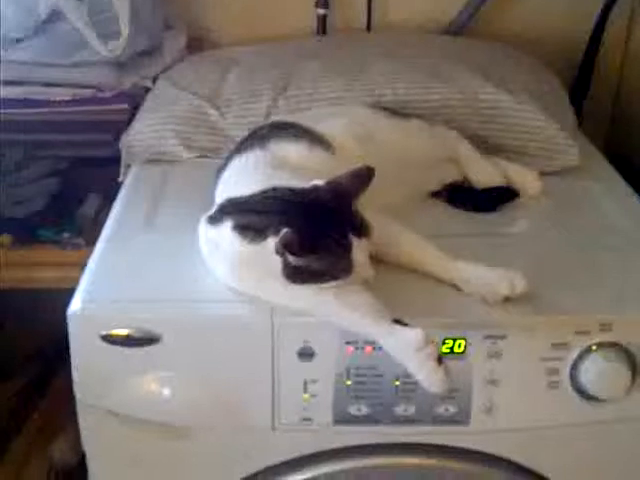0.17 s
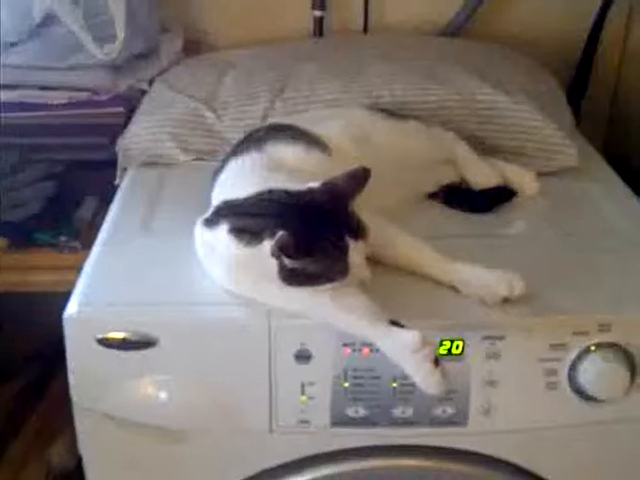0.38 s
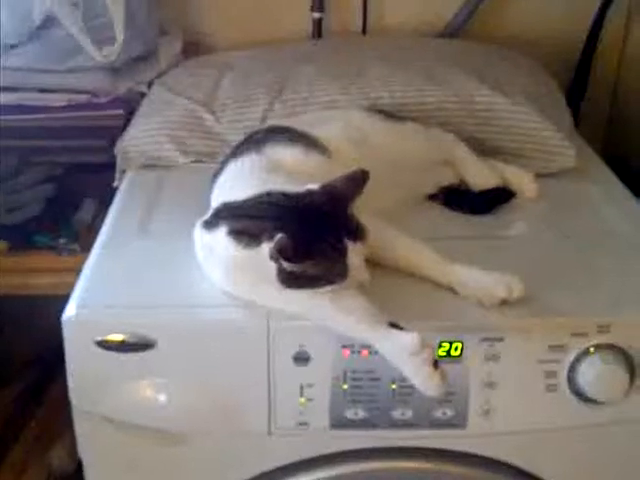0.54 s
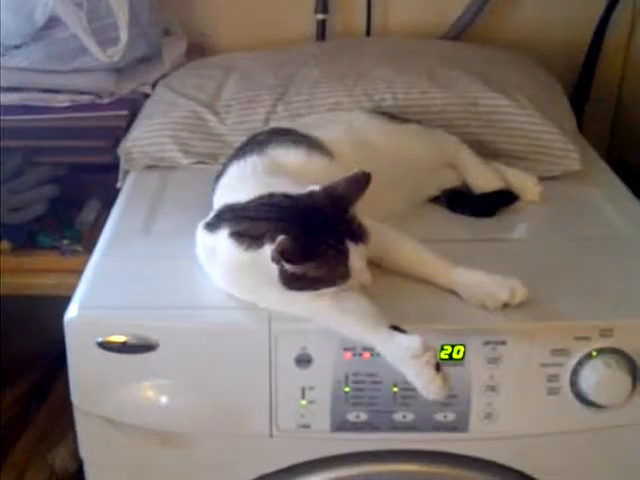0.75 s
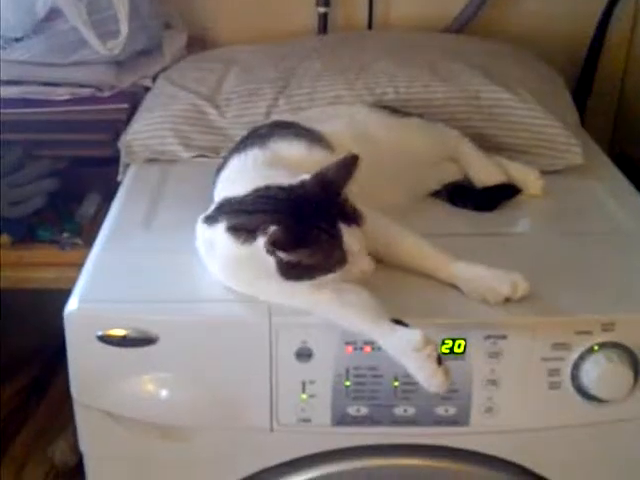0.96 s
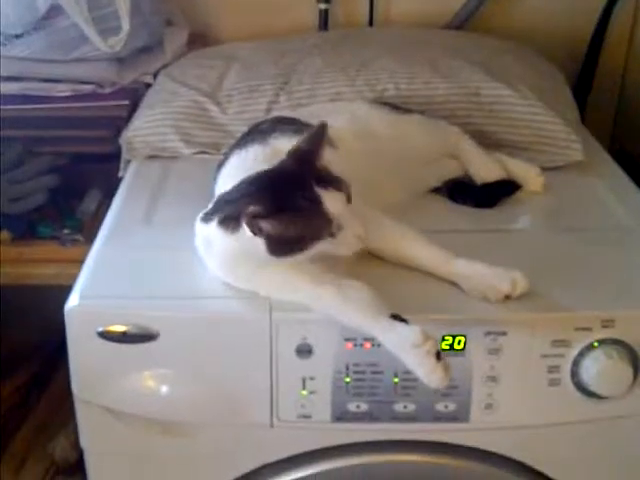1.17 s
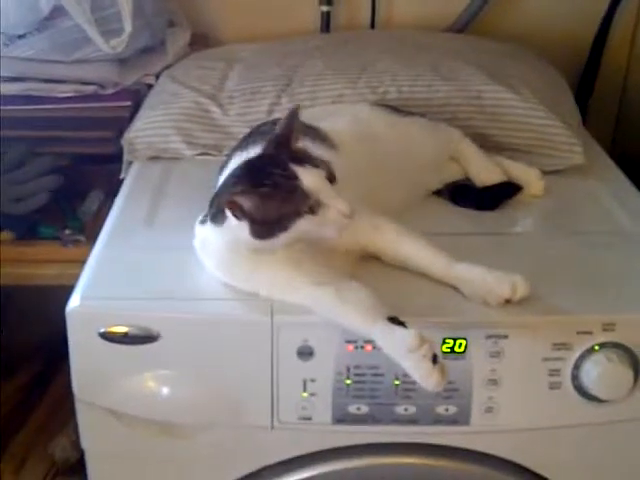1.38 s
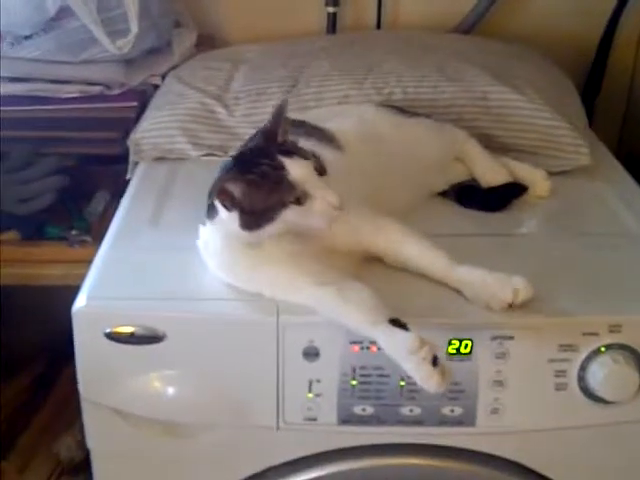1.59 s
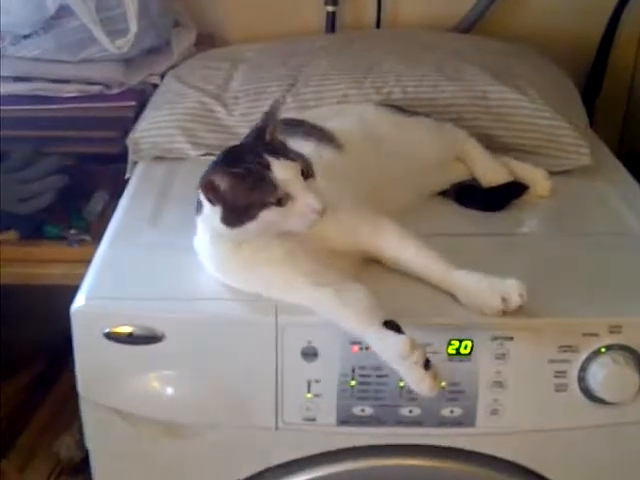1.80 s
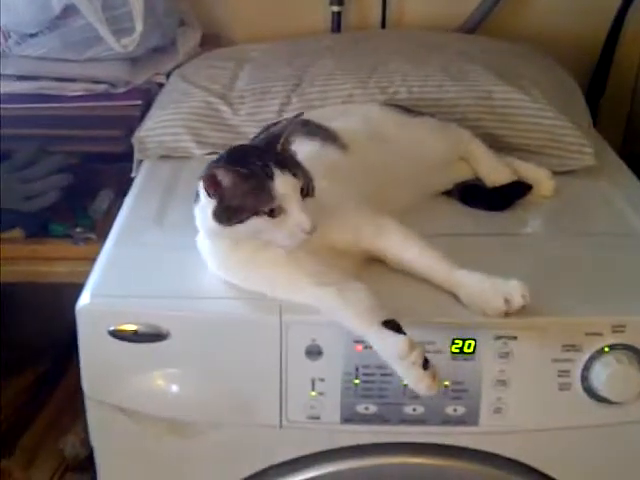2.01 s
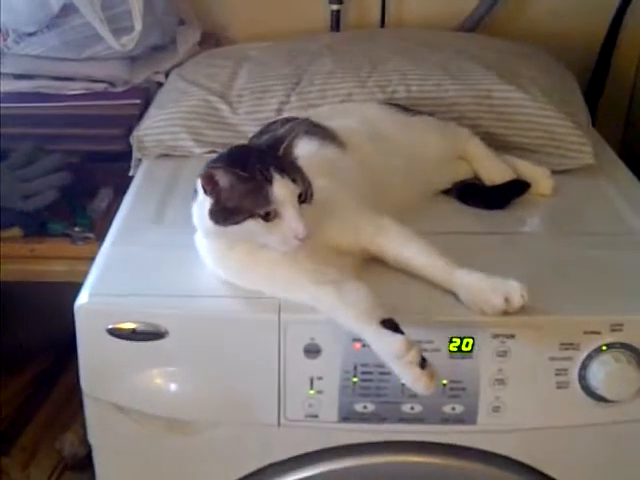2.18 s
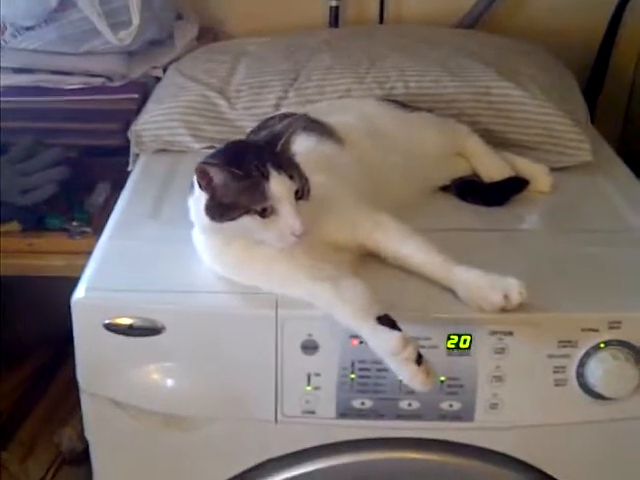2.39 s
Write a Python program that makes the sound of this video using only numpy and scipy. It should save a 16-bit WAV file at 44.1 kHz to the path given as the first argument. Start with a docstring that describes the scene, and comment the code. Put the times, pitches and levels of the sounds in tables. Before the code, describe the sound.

A washing machine spins at constant speed in a home. Silence until 0.19 s, then a loud, sharp electrical pop as the microphone opens. A steady low hum and rumble follow, shaking about ten times a second, with motor whine and airy, ticking hiss. A rattly bump lands at 0.6 s; light rattles gather from 1.4 s, with dull soft thuds around 2 s. Close, muffled treble.

```python
"""Silence, then an electrical pop as the microphone wakes onto a washing machine spinning steadily at home.
The unbalanced drum shakes the cabinet once a turn: sines at multiples of the drum speed, loosely in phase.
The motor hums on mains multiples and whines as noise in narrow resonances; air and bearings hiss as
shaped noise and rattle as ringing clicks, both swelling three times a turn.
Over it fall rattly noise bursts and dull bumps: one early, a cluster late, each a short low ring."""
import sys
import numpy as np
from scipy import signal
from scipy.io import wavfile

SR = 44100
rng = np.random.default_rng(int(sys.argv[2]) if len(sys.argv) > 2 else 0)


def store_wav(level_fs):
    """Save 16-bit WAV to argv[1]."""
    pcm = np.round(np.clip(np.atleast_2d(level_fs), -1, 1) * 32767)
    wavfile.write(sys.argv[1], SR, pcm.T.astype(np.int16))


N = 108045

# cabinet shake: multiple of drum speed, mean level/dB rms
DRUM_HARMONICS = [(1, -68), (3, -73), (4, -76), (5, -63), (8, -68), (9, -71), (10, -69), (11, -56),
                  (12, -68), (13, -70), (14, -69), (15, -59), (16, -57), (17, -73), (18, -64), (19, -66),
                  (20, -66), (21, -69), (22, -64), (23, -52), (24, -65), (25, -64), (26, -66), (27, -60),
                  (28, -56), (29, -63), (30, -58), (31, -66), (32, -64), (33, -62), (34, -68), (35, -71),
                  (36, -65), (38, -75), (39, -73), (40, -70), (41, -68), (43, -72), (44, -75), (45, -71),
                  (46, -76), (47, -73), (48, -72), (49, -74), (50, -73), (52, -72), (54, -73), (56, -71),
                  (57, -76), (64, -75), (66, -72), (67, -76)]
# motor hum: multiple of mains, level/dB rms
HUM_HARMONICS = [(1, -62), (3, -57), (4, -61), (5, -54), (6, -58)]
# motor whine, noise resonances: f/Hz, level/dB rms, width/Hz
WHINE_RESONANCES = [(138.4, -63, 8), (235, -63, 10), (290, -58, 30), (415, -66, 6), (565, -70, 10),
                    (872, -66, 25), (1063, -68, 15), (1150, -67, 80), (1217, -68, 10), (1250, -71, 10),
                    (1277, -68, 10), (2433, -78, 5), (2751, -85, 5)]
# air and bearing noise spectrum, relative: f/Hz, density/dB per Hz
RUSH_SPECTRUM = [(40, -20), (80, -9.5), (140, 0), (300, -1), (450, -6.5), (700, -9.5), (1150, -10.5),
                 (1500, -15), (2500, -22.5), (4500, -34), (6800, -41), (7600, -56)]
# slow treble swell, used relative to its mean: t/s, level/dB
TREBLE_SWELL = [(.2, -61.5), (0.698, -62), (1.0, -63), (1.299, -61.5), (1.45, -61), (1.701, -61.5),
                (1.9, -62.5), (2.149, -61.5), (2.45, -62.5)]
# bursts of something loose: onset t/s, nominal level/dB, centre f/Hz, width/octaves
RATTLE_BURSTS = [(0.228, -61, 5000, 0.34), (0.31, -66.5, 5000, .5), (0.338, -62, 4440, .9),
                 (0.602, -48, 2000, 1.8), (1.398, -59, 4600, 1.2), (1.466, -56, 3600, .4),
                 (1.6, -54, 2000, 0.88), (1.728, -53.5, 3470, 1.5), (1.798, -55.5, 2600, .7),
                 (1.829, -56.5, 3620, 1), (2.134, -56.5, 2400, 1), (2.227, -60.5, 3900, .6),
                 (2.322, -60, 3300, 1.4), (2.425, -55.5, 3500, 1.1)]
# dull bumps: onset t/s, peak before low-pass/dB, pitch f/Hz, low-pass f/Hz
BUMP_BLOWS = [(.6052, -28.5, 150, 2300), (1.9575, -38, 175, 500), (1.967, -42, 125, 500),
              (1.981, -38, 160, 500), (1.9958, -32.5, 128, 700), (2.0315, -37.5, 115, 400),
              (2.0535, -41, 150, 400)]
# microphone bias ramps, before filtering: start t/s, change/full scale, duration/s
BIAS_RAMPS = [(.19248, -.065, .00005), (.1933, -.15, .003), (.1937, -.025, .0003), (.1944, -.09, .0007),
              (.1952, -.2, .0008), (.196, -.12, .0002), (.1962, .05, .0013), (.19745, .43, .00005)]

DRUM_HZ, JOLT_S = 10.077, .0284  # turns per second; alignment time of the shake
PHASE_SCATTER_RAD, JOLT_LEAN_RAD, SHAKE_WAVER_DB = .85, .4, .8  # spread and lopsidedness of the jolt
MAINS_HZ, MAINS_PULSE_S, PULSE_LEAN_RAD = 59.976, .0016, -.85  # hum lines up into a lopsided pulse
SHAFT_HZ, SHAFT_DB, SHAFT_WAVER_DB = 276.9, -56, .69
RUSH_DB, TREBLE_FLICKER_DB, BAND_FLICKER_DB = -51, 1, .8
RIB_SWING_DB, RIB_S = 1.5, .016  # three swells a turn; time of the first
TURN_SWING_DB, TURN_S = .8, .058  # one swell a turn; its time
CLICKS_PER_S, CLICKS_DB = 510, -67.5  # rate before the swells act on it
BURST_T60_S, BURST_RISE_S, BURST_ROUGH_DB, BURST_DULL_HZ = .17, .004, 2, 1500
BUMP_PEAK_CYCLES, BUMP_LASTS_CYCLES = .4, .95  # delay of the fullest ring; span of its fade
POP_SOFTEN_HZ, COUPLING_HZ = 3100, 99
WAKE_S, WAKE_RISE_S = .1976, .002  # the sound path opens
CUTOFF_HZ, FLOOR_DB = 7050, -103


def from_db(db):
    """Decibels to gain."""
    return 10 ** (np.asarray(db) / 20)


def rms_one(x):
    """Scale to rms 1."""
    return x / np.sqrt(np.mean(x ** 2) + 1e-20)


def clock():
    """Time of each sample in seconds."""
    return np.arange(N) / SR


def drift(rate_hz):
    """Slow random wander of spread 1: noise through a double pole, made at SR / 40."""
    pole = np.exp(-2 * np.pi * rate_hz * 40 / SR)
    white = rng.standard_normal(N // 40 + 4002)
    slow = signal.lfilter([1], [1, -2 * pole, pole * pole], white)[4000:]  # settled part
    return np.interp(np.arange(N) / 40, np.arange(len(slow)), rms_one(slow - slow.mean()))


def ring(drive, hz, t60_s):
    """Two-pole resonance: a unit click sets a decaying sine of initial height 1 ringing."""
    radius = from_db(-60 / (t60_s * SR))
    w = 2 * np.pi * hz / SR
    return signal.lfilter([0, np.sin(w)], [1, -2 * radius * np.cos(w), radius * radius], drive + 1e-18)


def tone(hz, db, phase_rad):
    """A sine at an rms level."""
    return np.sqrt(2) * from_db(db) * np.cos(2 * np.pi * hz * clock() + phase_rad)


def band(noise, low_hz, high_hz):
    """Second-order band-pass design applied to noise."""
    sos = signal.butter(2, [low_hz, high_hz], "band", fs=SR, output="sos")
    return signal.sosfilt(sos, noise)


def swell_db():
    """Level swing with the drum, one and three swells a turn, plus the slow treble swell."""
    t_s, db = np.transpose(TREBLE_SWELL)
    turn_rad_s = 2 * np.pi * DRUM_HZ
    ribs = RIB_SWING_DB * np.cos(3 * turn_rad_s * (clock() - RIB_S))
    turn = TURN_SWING_DB * np.cos(turn_rad_s * (clock() - TURN_S))
    return ribs + turn + np.interp(clock(), t_s, db - db.mean())


def rush():
    """Air and bearings: third-octave noise bands; the higher ones swell and flicker together."""
    spectrum_hz, density_db = np.transpose(RUSH_SPECTRUM)
    white = rng.standard_normal((2, N))  # neighbouring bands take alternate noises
    shared_db = swell_db() + TREBLE_FLICKER_DB * drift(12)
    edges_hz = 36 * 2 ** np.arange(0, 8, 1 / 3)
    out = np.zeros(N)
    for k, (low, high) in enumerate(zip(edges_hz, edges_hz[1:])):
        centre = np.sqrt(low * high)
        follows = np.clip(centre / 1100, 0, 1)
        gain_db = np.interp(np.log(centre), np.log(spectrum_hz), density_db)
        gain_db = gain_db + follows * shared_db + BAND_FLICKER_DB * drift(10)
        out += from_db(gain_db) * band(white[k % 2], low, high)
    return from_db(RUSH_DB) * rms_one(out)


def panel_clicks():
    """Random clicks ring small panel resonances, denser at each swell."""
    sizes = from_db(4 * np.minimum(rng.exponential(1, N), 4)) * rng.choice([-1, 1], N)
    born = rng.random(N) < CLICKS_PER_S * from_db(2.5 * swell_db()) / SR
    dealt = rng.integers(0, 14, N)  # resonance each click strikes
    out = np.zeros(N)
    for k, hz in enumerate(np.geomspace(1200, 6000, 14)):
        out += ring(sizes * born * (dealt == k), hz, 13 / hz) * 1500 / hz
    return from_db(CLICKS_DB) * rms_one(out)


def loose_bursts():
    """Something loose: rough band noise with a fast rise and exponential decay."""
    white = signal.lfilter(*signal.butter(1, BURST_DULL_HZ, fs=SR), rng.standard_normal(N))
    white = white * from_db(BURST_ROUGH_DB * drift(120))
    out = np.zeros(N)
    for t_s, db, hz, octaves in RATTLE_BURSTS:
        hiss = rms_one(band(white, hz * 2 ** (-octaves / 2), hz * 2 ** (octaves / 2)))
        age_s = clock() - t_s
        rise = np.clip(age_s / BURST_RISE_S, 0, 1)
        out += hiss * rise * from_db(db - 5.5 - 60 * np.abs(age_s) / BURST_T60_S)
    return out


def bumps():
    """Soft blows: a low ring of about a cycle and a half, each dulled by its own low-pass."""
    out = np.zeros(N)
    for t_s, db, hz, cut_hz in BUMP_BLOWS:
        cycles = hz * (clock() - t_s)
        swell = (cycles > 0) * np.exp(-((cycles - BUMP_PEAK_CYCLES) / BUMP_LASTS_CYCLES) ** 2)
        blow = -from_db(db) * swell * np.cos(2 * np.pi * cycles)
        out += signal.lfilter(*signal.butter(2, cut_hz, fs=SR), blow)
    return out


def pop():
    """Bias drops, slides down in uneven ramps and snaps up, heard through two coupling capacitors."""
    bias = np.zeros(N)
    for t_s, change, length_s in BIAS_RAMPS:
        bias += change * np.clip((clock() - t_s) / length_s, 0, 1)
    bias = signal.lfilter(*signal.butter(2, POP_SOFTEN_HZ, fs=SR), bias)
    low_cut = signal.butter(1, COUPLING_HZ, "high", fs=SR)
    return signal.lfilter(*low_cut, signal.lfilter(*low_cut, bias))


def motor():
    """Steady mains hum, a wavering shaft line, and whine as noise in narrow resonances."""
    out = tone(SHAFT_HZ, SHAFT_DB + SHAFT_WAVER_DB * drift(.61), rng.uniform(0, 2 * np.pi))
    for k, db in HUM_HARMONICS:
        phase = np.pi - 2 * np.pi * k * MAINS_HZ * MAINS_PULSE_S + PULSE_LEAN_RAD
        out += tone(k * MAINS_HZ, db, phase)
    white = rng.standard_normal(N)
    for hz, db, width_hz in WHINE_RESONANCES:
        t60_s = np.log(1000) / (np.pi * width_hz)
        out += from_db(db) * rms_one(ring(white, hz, t60_s))
    return out


def cabinet():
    """Unbalanced drum: multiples of the turn, loosely lined up on one jolt, levels wavering."""
    wavers = [drift(.74) for _ in range(4)]  # shared by every fourth line
    out = np.zeros(N)
    for i, (k, db) in enumerate(DRUM_HARMONICS):
        phase = np.pi - 2 * np.pi * k * DRUM_HZ * JOLT_S + JOLT_LEAN_RAD
        phase += PHASE_SCATTER_RAD * rng.standard_normal()
        out += tone(k * DRUM_HZ, db + SHAKE_WAVER_DB * wavers[i % 4], phase)
    return out


def scene():
    """The machine, the bursts and the bumps, one channel."""
    return (rush() + panel_clicks() + loose_bursts() + bumps() + motor() + cabinet())[None]


def record(dry):
    """Silence, the pop, then the open microphone; steep top cut, faint noise floor from the pop on."""
    opened = np.clip((clock() - WAKE_S) / WAKE_RISE_S, 0, 1)
    top_cut = signal.ellip(8, .5, 65, CUTOFF_HZ, fs=SR, output="sos")
    heard = signal.sosfilt(top_cut, dry * opened + pop())
    powered = clock() > BIAS_RAMPS[0][0]
    return heard + from_db(FLOOR_DB) * rng.standard_normal(N) * powered


dry = scene()
out = record(dry)
store_wav(out)
```